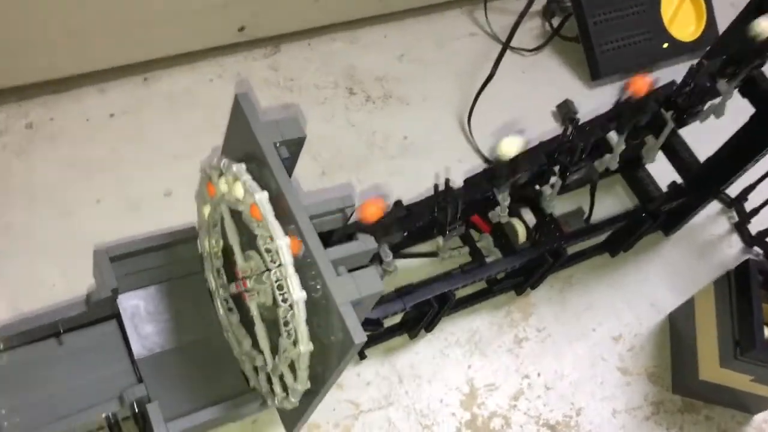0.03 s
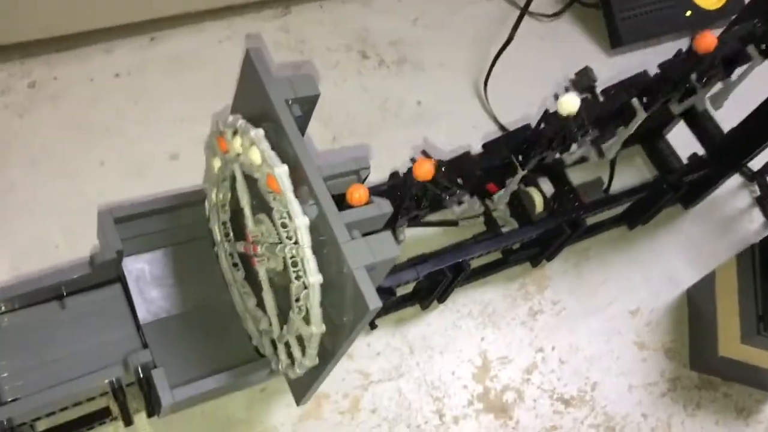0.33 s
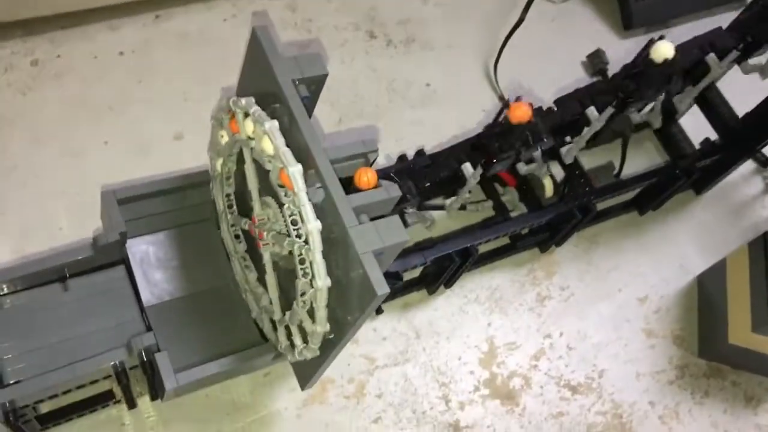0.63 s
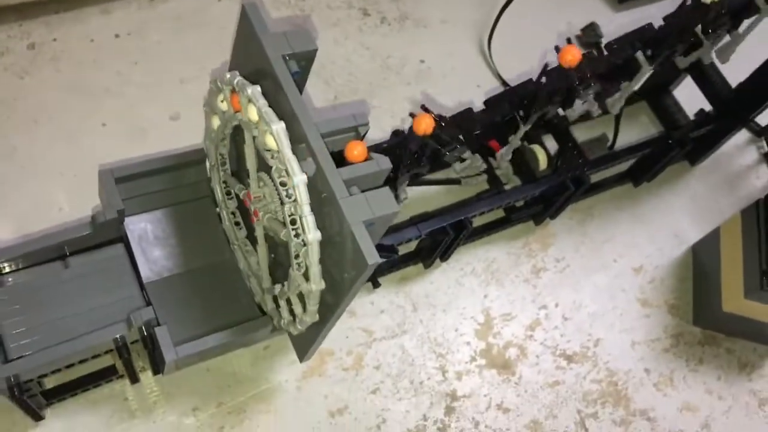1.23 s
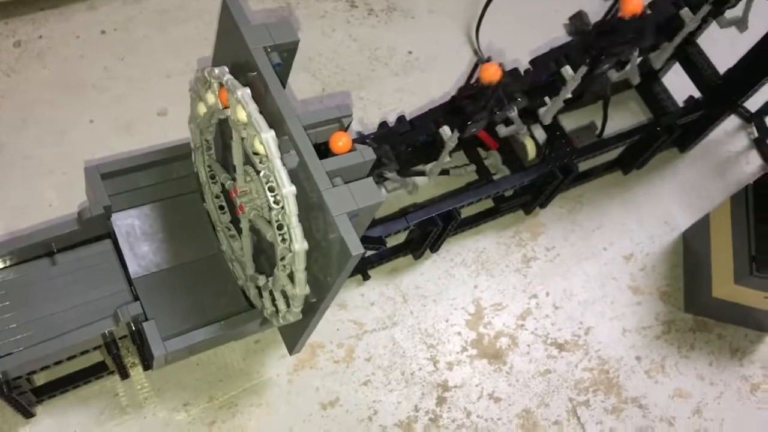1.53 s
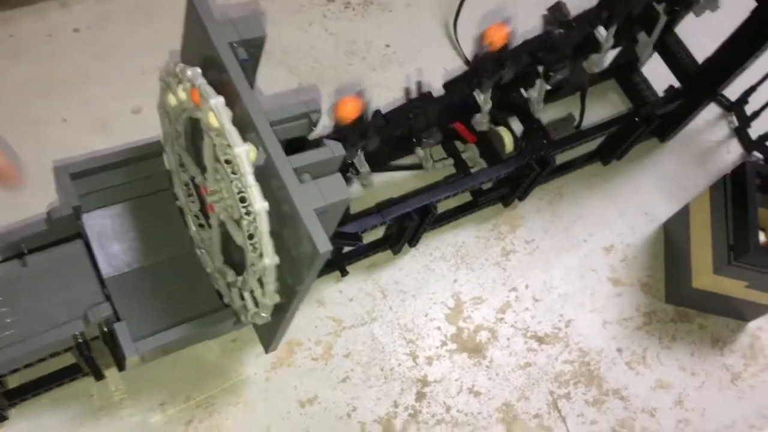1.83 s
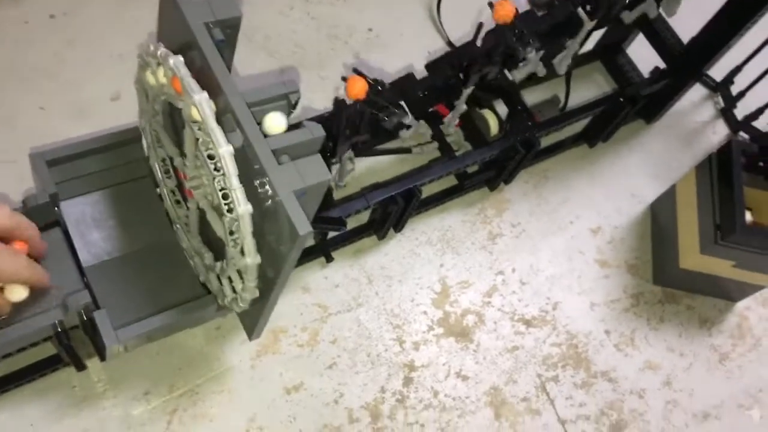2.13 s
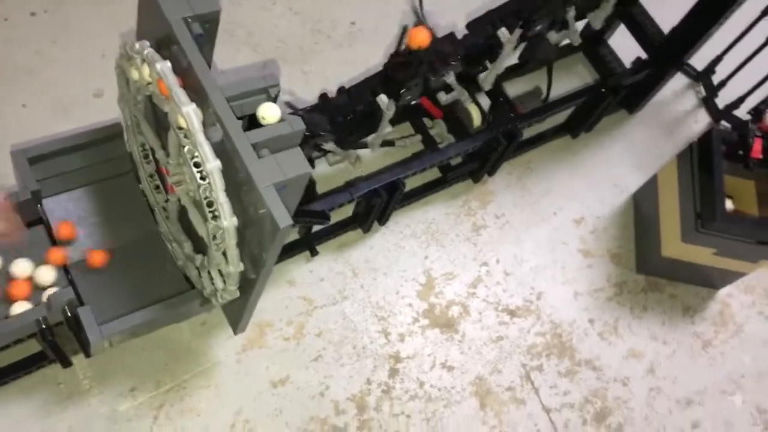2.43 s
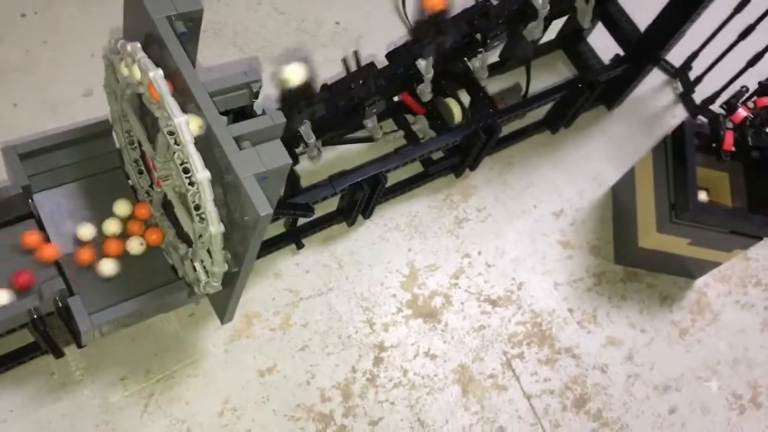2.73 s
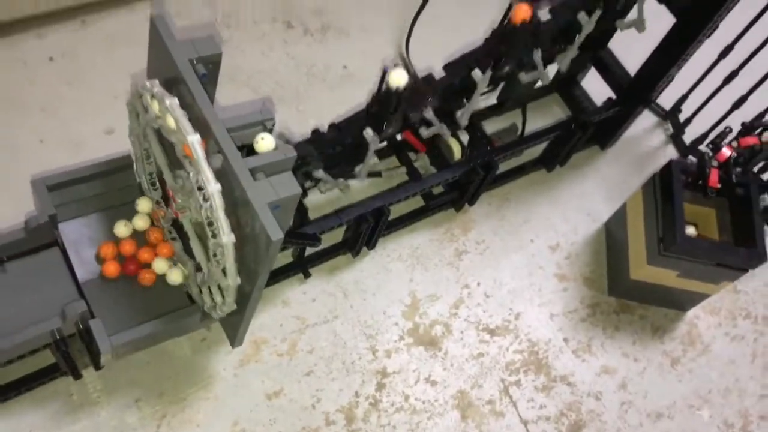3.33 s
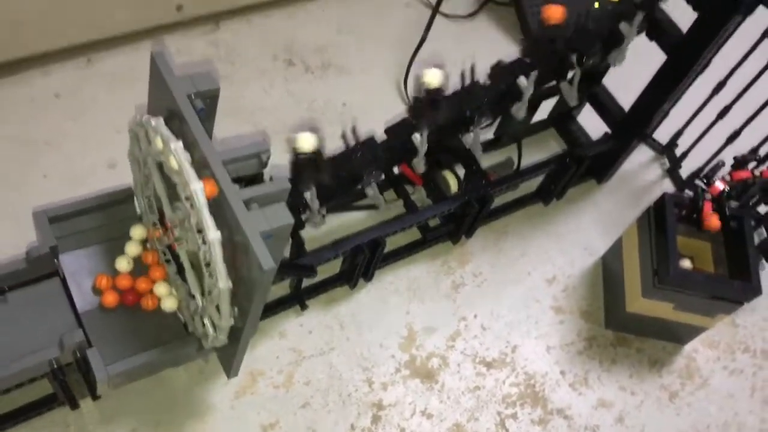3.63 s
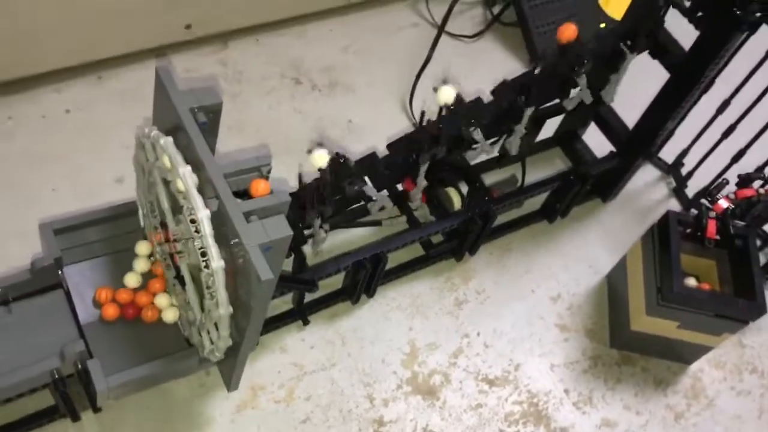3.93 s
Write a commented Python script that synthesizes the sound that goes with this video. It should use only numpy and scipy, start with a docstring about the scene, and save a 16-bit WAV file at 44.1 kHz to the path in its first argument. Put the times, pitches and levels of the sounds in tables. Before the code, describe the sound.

Plastic balls knock along a motorized toy brick mechanism, then several more clatter into a tray.

```python
"""Small plastic balls knock and rumble from lever to lever through a motor-driven machine of toy bricks. Each
hit is a bright clack and a hollow thud that sets the bricks ringing. After two seconds a handful of balls drops
into a tray, where they bounce, roll and settle. Behind them levers tap, gears fizz, axles squeak and the motor
drones and hums, all heard from close by in a hard room."""
import sys
import numpy as np
from scipy import signal
from scipy.fft import rfft, irfft
from scipy.io import wavfile

SR = 44100
rng = np.random.default_rng(int(sys.argv[2]) if len(sys.argv) > 2 else 0)


def dump_mix(stems):
    """Bounce the given channels to the path in sys.argv[1] as a 16-bit WAV at rate SR."""
    frames = np.atleast_2d(stems).T  # one column per channel
    limited = np.clip(frames, -1, 1)  # hard clip at full scale
    pcm = np.round(limited * 32767).astype(np.int16)
    wavfile.write(sys.argv[1], SR, pcm)


N = 176400  # 4 seconds
TREBLE_LIMIT_HZ = 15250


def amp(db):
    """Turns decibels into a number to multiply a sound by."""
    return 10 ** (np.asarray(db) / 20)


def unit(x):
    """Scales a sound to a standard strength (rms 1)."""
    return x / np.sqrt(np.mean(x ** 2) + 1e-20)


def at_pitch(points, hz):
    """Looks up a value between the rows of a pitch table."""
    pitches, values = np.transpose(points)
    return np.interp(np.log(hz + 1), np.log(pitches + 1), values)


def loudness(points):
    """Joins rows of time_s, level_db into a volume curve."""
    return amp(np.interp(np.arange(N) / SR, *np.transpose(points)))


def add(mix, start_s, sound):
    """Mixes a sound in at its start time."""
    part = mix[max(round(start_s * SR), 0):][:len(sound)]
    part += sound[:len(part)]


def colour(x, points):
    """Gives a sound the tone (balance of low and high) in a table, at standard strength."""
    log_gain = np.log(amp(at_pitch(points, abs(np.fft.fftfreq(2048, 1 / SR)))))
    response = np.fft.ifft(np.exp(np.conj(signal.hilbert(log_gain)))).real  # silent before a hit
    return unit(signal.fftconvolve(x, response)[:len(x)])


def noise_band(hz, width_hz):
    """Noise around one pitch, at standard strength."""
    freqs = np.fft.rfftfreq(N, 1 / SR)
    band = np.exp(-2 * ((freqs - hz) / width_hz) ** 2)
    return unit(irfft(rfft(rng.standard_normal(N)) * band, N))


def grains(per_s=2000, spread_db=3.5):
    """Tiny random clicks, a few much louder than the rest."""
    sizes = amp(spread_db * np.minimum(rng.exponential(1, N), 4))
    return sizes * rng.choice([-1, 1], N) * (rng.random(N) < per_s / SR)


def wavering(hz, waver_hz):
    """A tone whose pitch wobbles at random."""
    pitch_hz = hz + waver_hz * noise_band(0, width_hz=12.9)
    return unit(np.sin(2 * np.pi * np.cumsum(pitch_hz) / SR))


# tone of the still air: pitch_hz, gain_db
AIR_TONE = [(35,-41),(115,0.5),(190,-2),(350,-3),(900,-23),(9000,-24)]
def air(level_db=-57.5):
    """The room's still air makes a faint, low hush."""
    return amp(level_db) * colour(rng.standard_normal(N), AIR_TONE)


# time the echo takes to fade by 60 dB: pitch_hz, fade_s
ECHO_FADE = [(1300,.3),(9000,0.2)]
def room_echo(sound, level_db=-9.5, dull_hz=4960):
    """Hard walls send back many echoes, whose high notes die first."""
    echoes = rng.standard_normal(SR // 2) * (rng.random(SR // 2) < .1)
    echoes[:int(.005 * SR)] = 0
    hz, t, spectrum = signal.stft(echoes, SR)
    fade = amp(-60 * t / at_pitch(ECHO_FADE, hz)[:, None])
    tail = signal.istft(spectrum * fade, SR)[1]
    tail = signal.lfilter(*signal.butter(1, dull_hz, fs=SR), tail / np.linalg.norm(tail))
    return amp(level_db) * signal.fftconvolve(sound, tail)[:N]


# the motor's hum between lever strokes: pitch_hz, level_db
MOTOR_HUM = [(56,-58.5),(84,-61.5)]
# how much each stroke lifts the hum: boost_db
STROKE_BOOSTS = [8.3,4.9,9.6,2.1,7.8,5.1,9.2,7.6]
# the motor's drone: time_s, level_db
DRONE_LEVEL = [(.74,-72),(.83,-54),(1.03,-53),(1.13,-68)]
def motor(first_stroke_s=0.15, stroke_gap_s=0.504, swell_s=0.072):
    """The motor drones and hums, and its hum and rumble swell with each lever stroke."""
    t = np.arange(N) / SR - first_stroke_s
    swell_db = sum(db * np.exp(-((t - k * stroke_gap_s) / swell_s) ** 2)
                   for k, db in enumerate(STROKE_BOOSTS))
    hum = sum(amp(db) * wavering(hz, waver_hz=4.72) for hz, db in MOTOR_HUM)
    rumble = amp(-61.5) * noise_band(87, width_hz=45)
    drone = wavering(148.4, waver_hz=3.01) * loudness(DRONE_LEVEL)
    return (hum + rumble) * amp(swell_db) + drone


# loudness of the rubbing gear teeth: time_s, level_db
GEAR_LEVEL = [(.16,-36),(.65,-37),(.9,-33.5),(1.2,-36.5),(1.56,-35.5),(1.75,-33),(2.18,-36.5),(3.3,-37.5),(3.45,-34.5),(3.79,-35),(3.9,-36.5)]
# their tone: pitch_hz, gain_db
GEAR_TONE = [(200,-26),(1000,-2.5),(5200,-2.5),(6200,2.5),(7500,-2.5),(8600,0),(10300,-4.5),(12800,2.5),(15200,1)]
def gears(range_hz=4400, flutter_hz=26.5):
    """Each gear rubs unevenly in its own pitch range, while the axles chirp faintly."""
    freqs, teeth = np.fft.rfftfreq(N, 1 / SR), np.zeros(N)
    for centre_hz in np.arange(0, TREBLE_LIMIT_HZ + range_hz, range_hz):
        rub = grains(per_s=4000, spread_db=2) * amp(2.5 * noise_band(flutter_hz, width_hz=57))
        band = np.sqrt(np.maximum(1 - abs(freqs - centre_hz) / range_hz, 0))
        teeth += irfft(rfft(unit(rub)) * band, N)
    whistle = noise_band(6140, width_hz=540)
    flicker_db = 10.5 * np.minimum(noise_band(flutter_hz, width_hz=flutter_hz), 2)
    chirps = amp(-13) * unit(whistle * amp(flicker_db))
    return (colour(teeth, GEAR_TONE) + chirps) * loudness(GEAR_LEVEL)


# axle squeaks: start_s, length_s, pitch_hz, level_db
SQUEAKS = [(0.29,0.069,6650,-40.5),(1.78,0.015,6200,-33.5),(3.418,0.051,6200,-43)]
def axles():
    """Now and then a turning axle gives a short, high squeak."""
    out = np.zeros(N)
    for start_s, length_s, hz, db in SQUEAKS:
        swell = np.sqrt(np.hanning(int(length_s * SR)))
        squeak = swell * noise_band(hz, width_hz=540)[:len(swell)]
        add(out, start_s, amp(db) * unit(squeak))
    return out


def rattle(fade_s, rise_s=0.00047):
    """Loose plastic rattles after a hit: a burst of noise that falls 60 dB in fade_s."""
    t = np.arange(SR // 10) / SR
    onset = 1 - np.exp(-(t / rise_s) ** 2)
    return rng.standard_normal(len(t)) * amp(-60 * t / fade_s) * onset


# tone of a clack on the bricks, from a lever or a ball: pitch_hz, gain_db
CLACK_TONE = [(200,-30),(1000,-17.5),(2300,3),(4100,3),(5100,-2.5),(8400,-5.5),(9800,-11),(15000,-33)]
# levers hitting their stops: start_s, pitch_hz, level_db
LEVER_TAPS = [(0.367,2130,-45),(0.431,3950,-31),(0.434,5000,-37.5),(0.525,2900,-39),(0.542,3470,-37),(0.613,2420,-38.5),(0.666,2880,-41.5),(0.872,2870,-47.5),(0.898,4530,-39.5),(0.977,4370,-43.5),(3.961,3600,-52)]
def levers(ticks_per_s=12, low_hz=1180, high_hz=8000):
    """Levers tap their stops, and the gears tick faintly at random."""
    gear_ticks = [(when * N / SR, low_hz * (high_hz / low_hz) ** height, -47 - 10 * softness)
            for when, height, softness in rng.random((int(ticks_per_s * N / SR), 3))]
    out = np.zeros(N)
    for start_s, hz, db in LEVER_TAPS + gear_ticks:
        tap = signal.lfilter(*signal.iirpeak(hz, Q=1.17, fs=SR), rattle(fade_s=0.026))
        add(out, start_s, amp(db) * colour(tap, CLACK_TONE))
    return out


def ring(notes, fade_s, spread_octaves):
    """Struck plastic rings with its own notes, in a different mix at every hit."""
    t, out = np.arange(SR // 6) / SR, 0
    for hz, db in notes:
        pitch_hz = hz * 2 ** (spread_octaves * rng.uniform(-1, 1))
        strength, phase = rng.rayleigh(), rng.random()
        out += strength * amp(db - 60 * t / fade_s) * np.sin(2 * np.pi * (pitch_hz * t + phase))
    return unit(out)


# tone of a ball's hollow thud: pitch_hz, gain_db
THUD_TONE = [(150,-50),(520,-22.5),(780,0.5),(1200,5),(1750,9),(2900,-11.5)]
def ball_hits(hits, clack_tone, notes, ring_db, fade_s=0.027, ring_s=0.11, spread_octaves=0):
    """Each ball gives a bright clack and a hollow thud, and what it hits rings on."""
    out = np.zeros(N)
    for start_s, clack_db, thud_db in hits:
        clack = amp(clack_db) * colour(rattle(fade_s), clack_tone)
        thud = amp(thud_db) * colour(rattle(fade_s), THUD_TONE)
        add(out, start_s, clack + thud)
        add(out, start_s, amp(thud_db + ring_db) * ring(notes, ring_s, spread_octaves))
    return out


# loudness of the jostling handful: time_s, level_db
JOSTLE_LEVEL = [(2.19,-68),(2.22,-33),(2.33,-32.5),(2.48,-56)]
# its tone: pitch_hz, gain_db
JOSTLE_TONE = [(120,-31),(280,2.5),(3300,-9),(3800,12.5),(4300,-5),(8500,2),(10500,-0.5)]
# ball hitting ball: start_s, clack_db, thud_db
CLICKS = [(2.203,-42.5,-42),(2.217,-42,-52),(2.224,-34.5,-39.5),(2.251,-40,-54),(2.269,-43,-52),(2.279,-41,-58),(2.288,-29.5,-46),(2.309,-35,-37),(2.313,-30.5,-46),(2.332,-38,-42),(2.367,-38.5,-40),(2.389,-41,-53),(2.402,-41,-47),(2.422,-38,-53)]
# tone of those clicks: pitch_hz, gain_db
CLICK_TONE = [(200,-28),(2000,-7.5),(3850,1.5),(5600,-3.5),(7300,-2.5),(8700,-2),(10500,-13.5)]
# the note a ball rings with: pitch_hz, gain_db
BALL_NOTES = [(3790,0)]
def balls_from_hand():
    """The balls jostle and click together as they leave the hand."""
    jostle = colour(grains(), JOSTLE_TONE) * loudness(JOSTLE_LEVEL)
    return jostle + ball_hits(CLICKS, CLICK_TONE, BALL_NOTES, ring_db=-5)


# loudness of rolling in the tray: time_s, level_db
TRAY_ROLL = [(2.19,-69),(2.21,-33),(2.4,-30.5),(2.51,-48),(2.68,-30.5),(3.01,-33),(3.1,-44.5),(3.16,-35.5),(3.25,-54),(3.31,-35),(3.4,-66)]
# its tone: pitch_hz, gain_db
TRAY_ROLL_TONE = [(150,-47.5),(480,-16),(680,-2),(1000,4.5),(1800,0),(2500,-8.5),(4400,-7),(5100,-10),(10000,-21)]
# balls hitting the tray floor: start_s, clack_db, thud_db
BOUNCES = [(2.434,-36,-36),(2.463,-34.5,-48),(2.487,-46,-49),(2.524,-35,-36),(2.567,-42,-38.5),(2.572,-35,-37),(2.629,-35,-36.5),(2.641,-35.5,-46),(2.676,-42,-44),(2.682,-32,-38),(2.737,-33,-44)]
# tone of their clack: pitch_hz, gain_db
BOUNCE_TONE = [(200,-44),(1000,2),(2300,-3),(4400,0),(5200,-11.5),(8400,-14.5),(10500,-49)]
# notes the tray rings with: pitch_hz, gain_db
TRAY_NOTES = [(1000,-8),(1120,-13.5),(2245,-4.5),(2720,-11)]
def balls_in_tray():
    """The balls bounce on the tray, make it ring and roll to rest."""
    roll = colour(grains(), TRAY_ROLL_TONE) * loudness(TRAY_ROLL)
    return roll + ball_hits(BOUNCES, BOUNCE_TONE, TRAY_NOTES, ring_db=-3, fade_s=0.032, ring_s=0.19)


# rise and fall of the rolling on the track: time_s, gain_db
TRACK_ROLL = [(0,-34.5),(.05,-31.5),(.165,-38.5),(.2,-30.5),(.36,-41),(.5,-28.5),(.58,-42.5),(.77,-47.5),(.83,-43),(1.13,-38),(1.4,-48.5),(3.8,-49),(3.85,-40),(4,-47.5)]
# its tone: pitch_hz, gain_db
TRACK_ROLL_TONE = [(150,-57),(450,-23.5),(800,-6),(1600,-5),(3800,-6),(7300,-17),(8300,-15.5),(9600,-20)]
# balls hitting levers, rails and the lifting wheel: start_s, clack_db, thud_db
KNOCKS = [(0.024,-34,-39),(0.051,-33.5,-38),(0.09,-36.5,-41.5),(0.191,-35,-38.5),(0.207,-30,-28.5),(0.255,-45,-40),
          (0.399,-39,-39),(0.467,-41,-41.5),(0.49,-33,-38),(0.721,-44.5,-49),(0.821,-41.5,-44),(1.001,-43.5,-42),
          (1.095,-36,-41.5),(1.115,-32,-38.5),(1.159,-34.5,-41.5),(1.211,-42,-40.5),(1.245,-33.5,-32),(1.251,-36,-39.5),
          (1.308,-39,-40.5),(1.321,-50,-44.5),(1.608,-29.5,-29),(1.998,-29,-30.5),(2.072,-42,-39.5),
          (2.778,-33,-28.5),(2.823,-45,-37.5),(2.842,-33,-34),(2.894,-36,-38),(2.947,-37.5,-43),(2.979,-35.5,-34.5),(3.156,-45.5,-44),
          (3.814,-33.5,-32.5),(3.819,-36,-31.5),(3.834,-44,-39.5),(3.849,-48,-45),(3.903,-44,-42.5)]
# notes the brick frame rings with: pitch_hz, gain_db
FRAME_NOTES = [(806,-2.5),(1095,-3),(1227,-5.5),(1500,-4.5),(1745,-1),(2850,-6.5),(3200,4.5)]
def balls_on_track():
    """Balls rumble over brick seams and knock the frame, which rings a bit differently at each spot."""
    roll = amp(3.5) * colour(grains(), TRACK_ROLL_TONE) * loudness(TRACK_ROLL)
    return roll + ball_hits(KNOCKS, CLACK_TONE, FRAME_NOTES, ring_db=-9.5, spread_octaves=0.025)


def scene():
    """The clatter and its echo, over the running machine and the still air."""
    clatter = balls_on_track() + balls_from_hand() + balls_in_tray() + levers()
    background = air() + motor() + gears() + axles()
    return (clatter + room_echo(clatter) + background)[None]


def record(dry):
    """Cuts off the very highest treble."""
    low_pass = signal.firwin(401, TREBLE_LIMIT_HZ, window=("kaiser", 8), fs=SR)
    return signal.oaconvolve(dry, low_pass[None], "same")


dry = scene()
out = record(dry)
dump_mix(out)
```